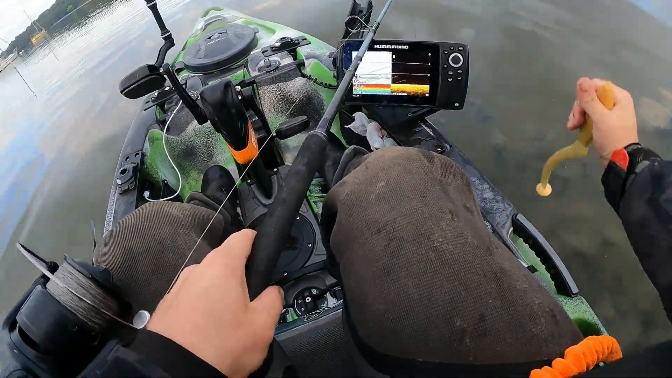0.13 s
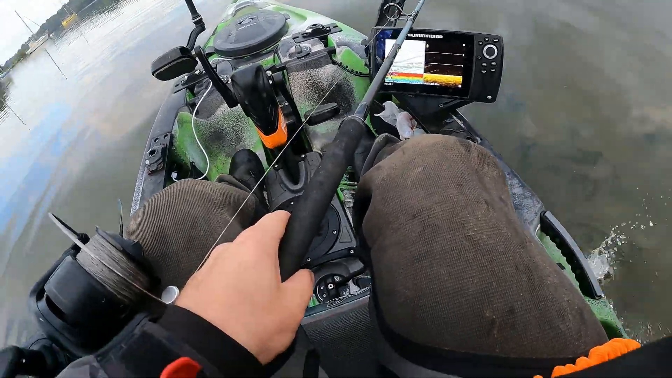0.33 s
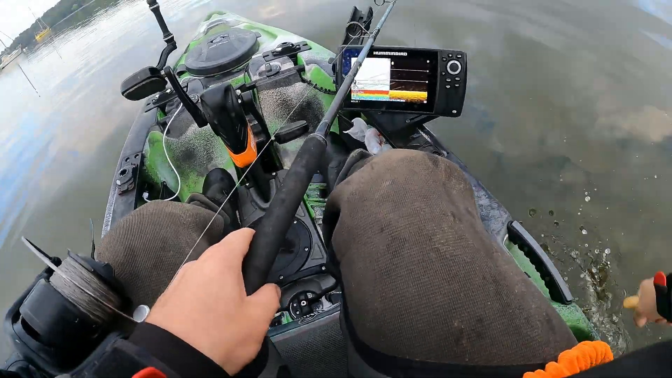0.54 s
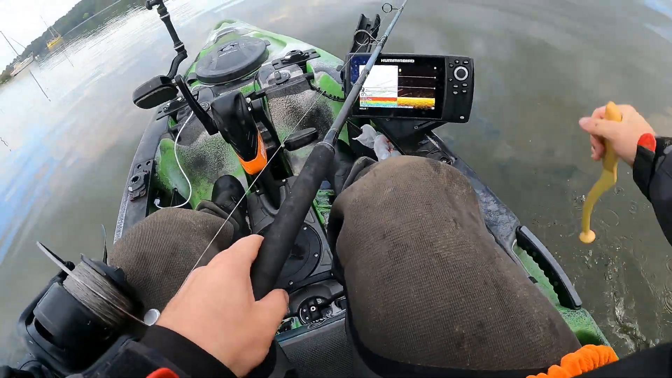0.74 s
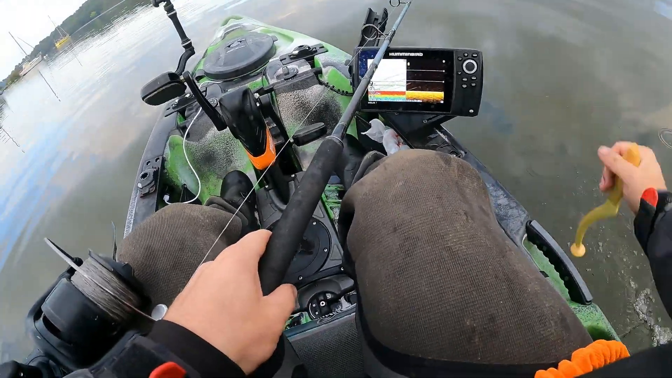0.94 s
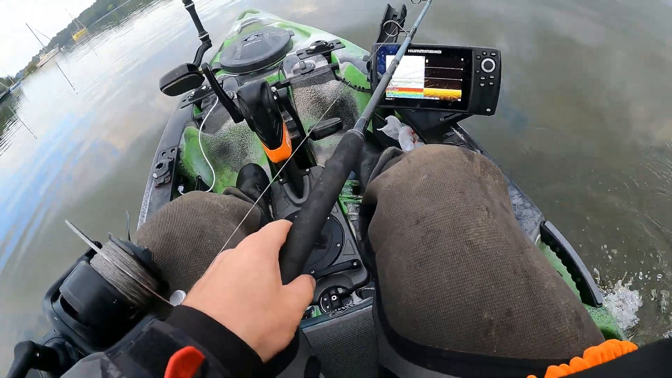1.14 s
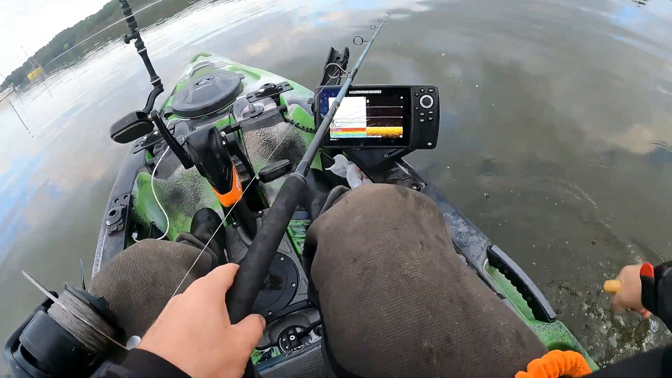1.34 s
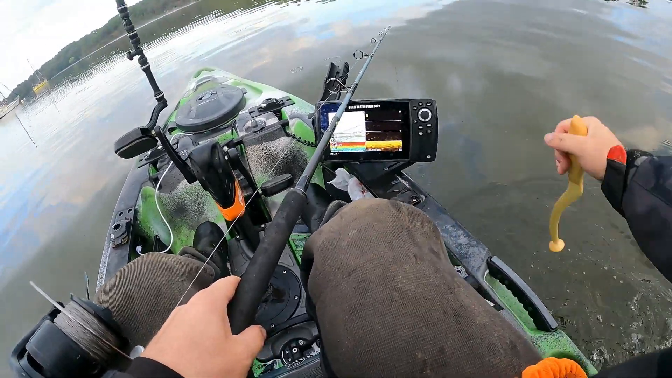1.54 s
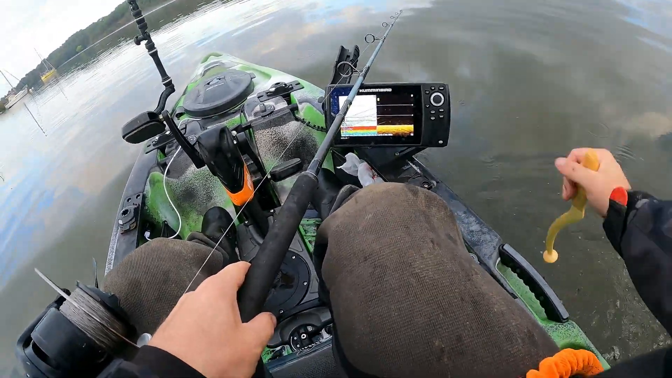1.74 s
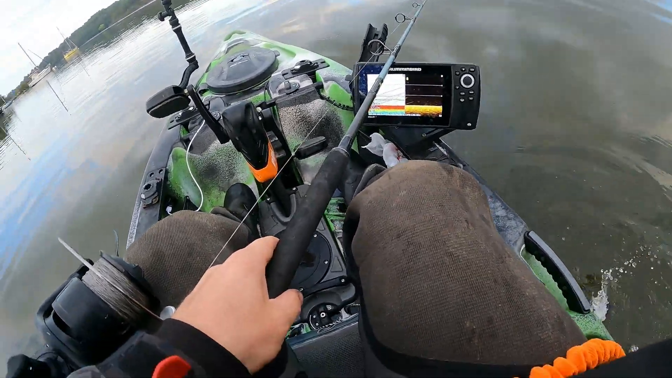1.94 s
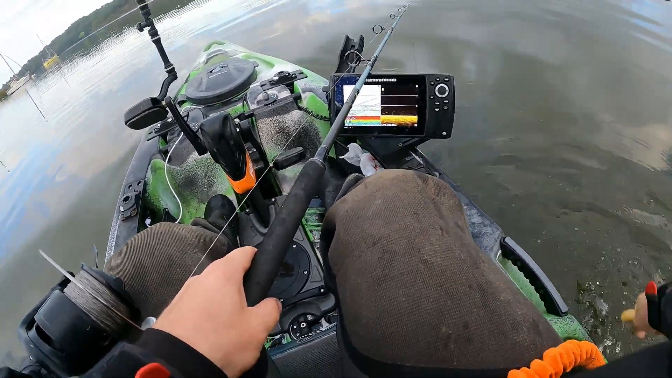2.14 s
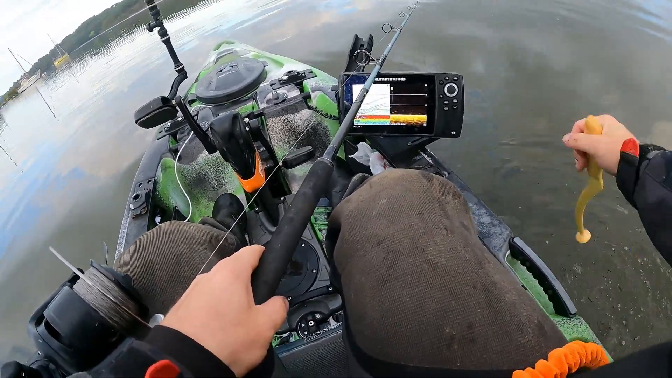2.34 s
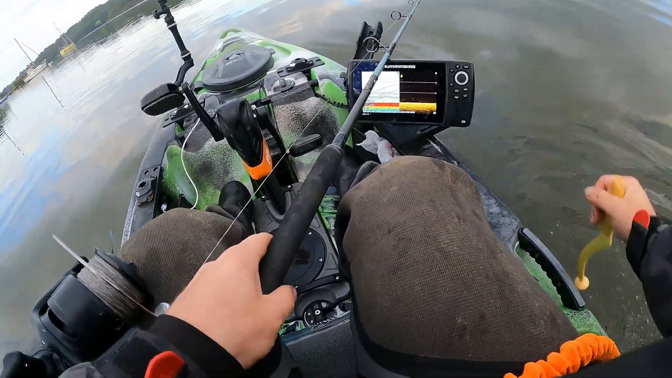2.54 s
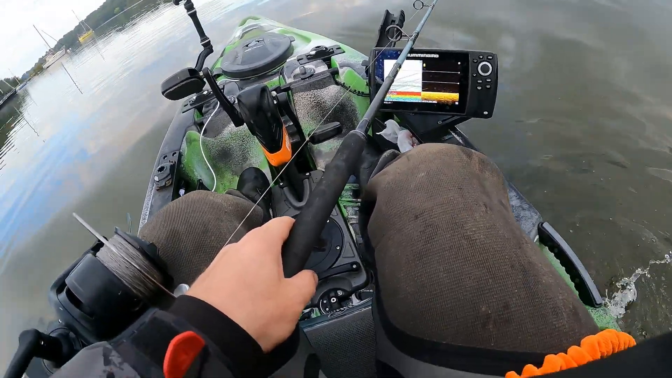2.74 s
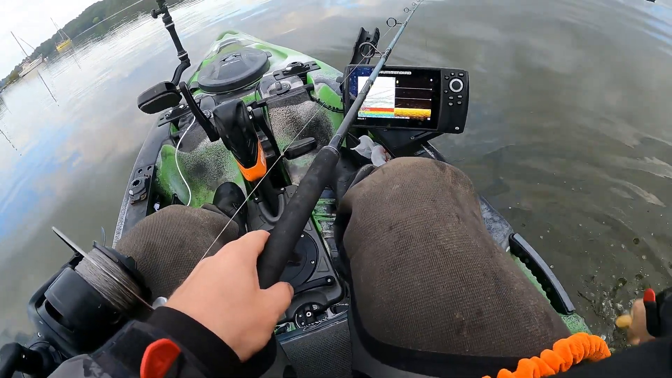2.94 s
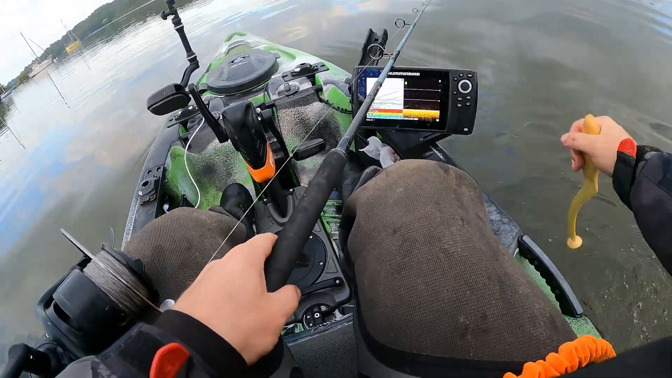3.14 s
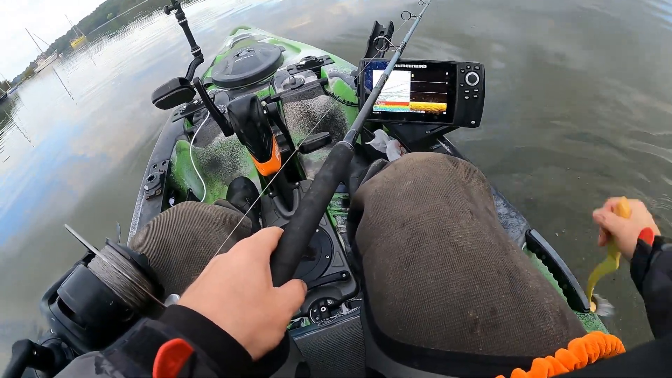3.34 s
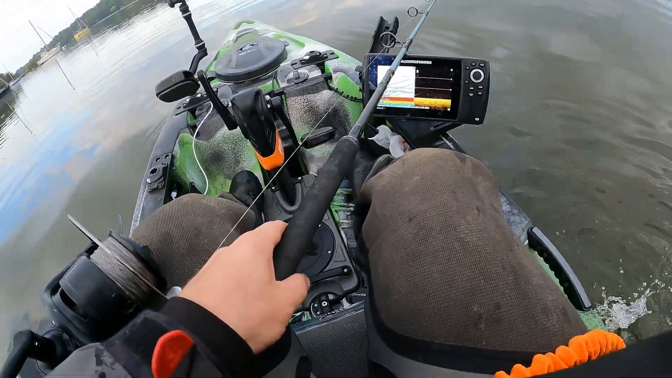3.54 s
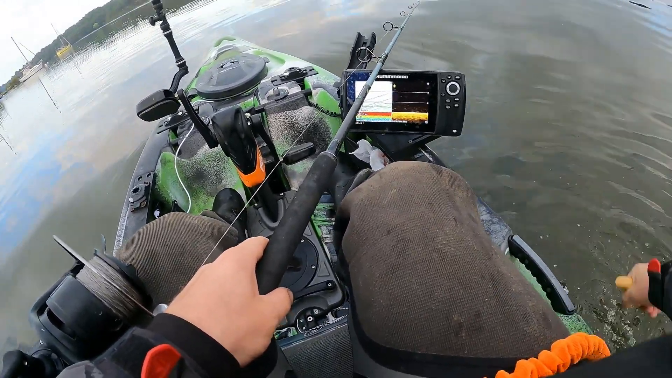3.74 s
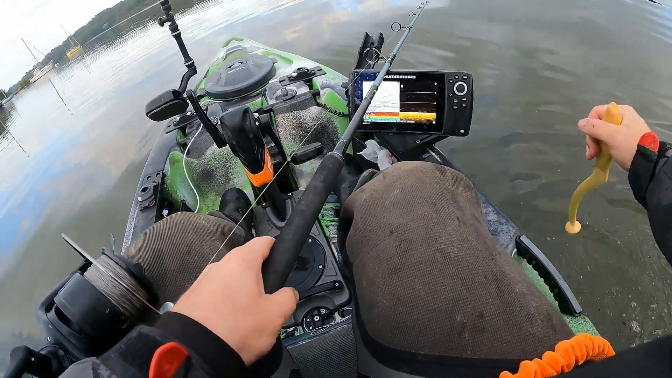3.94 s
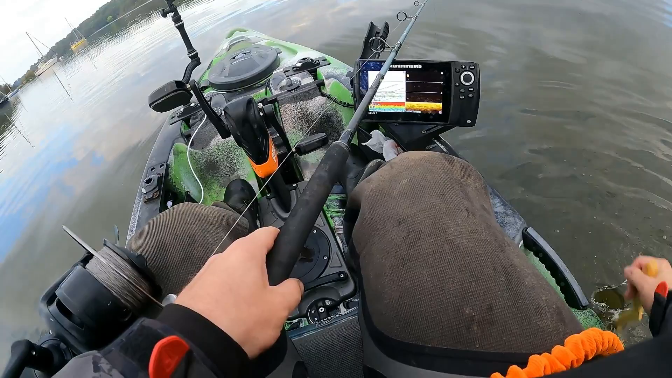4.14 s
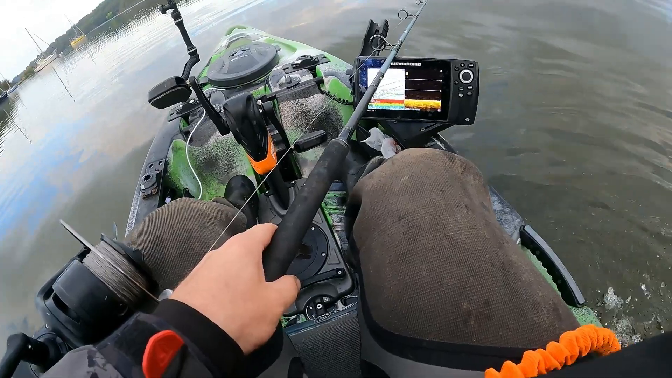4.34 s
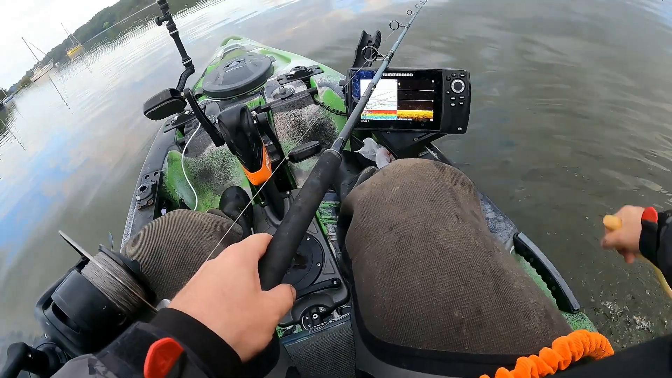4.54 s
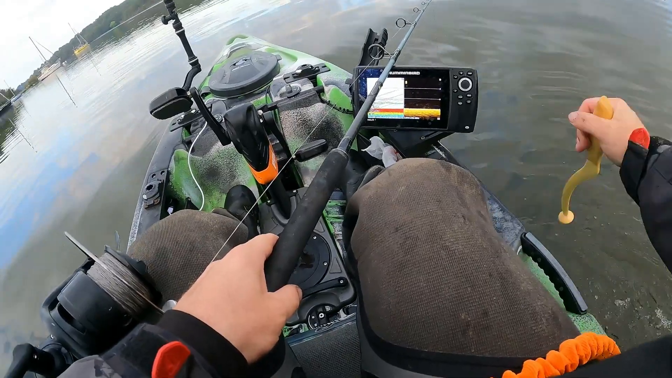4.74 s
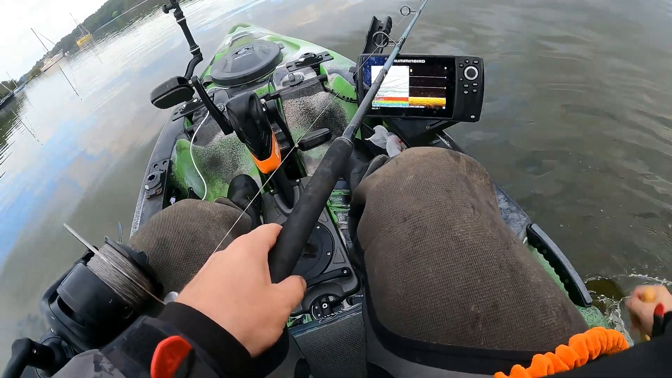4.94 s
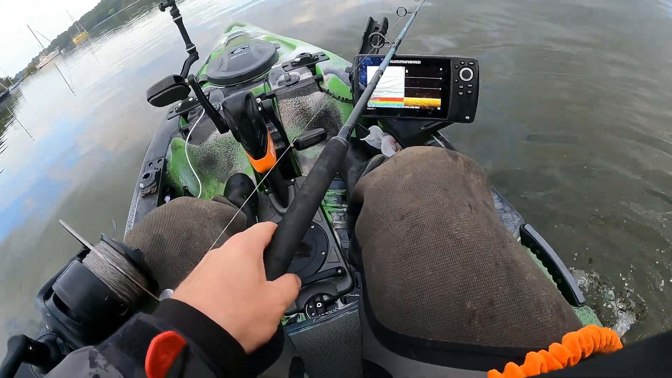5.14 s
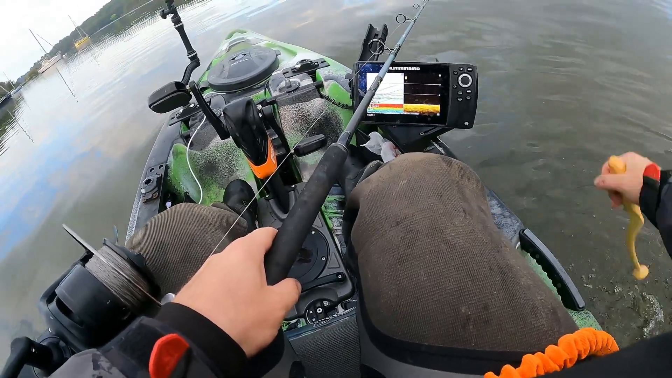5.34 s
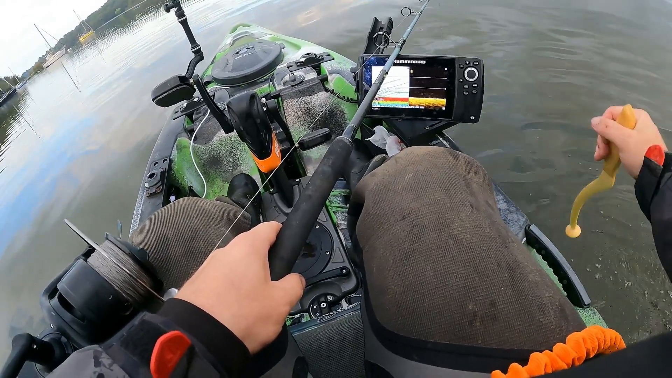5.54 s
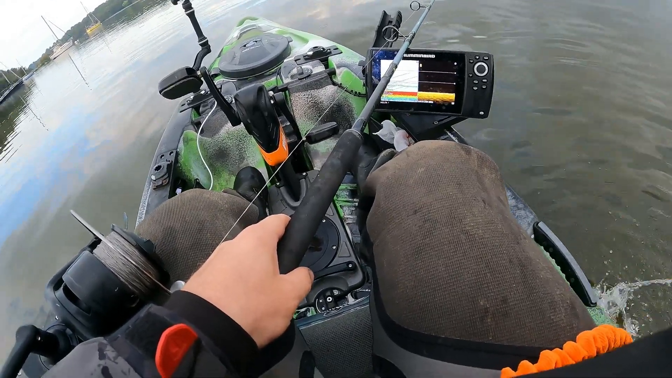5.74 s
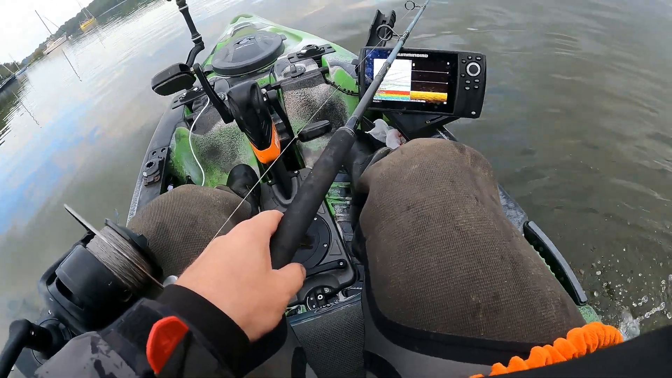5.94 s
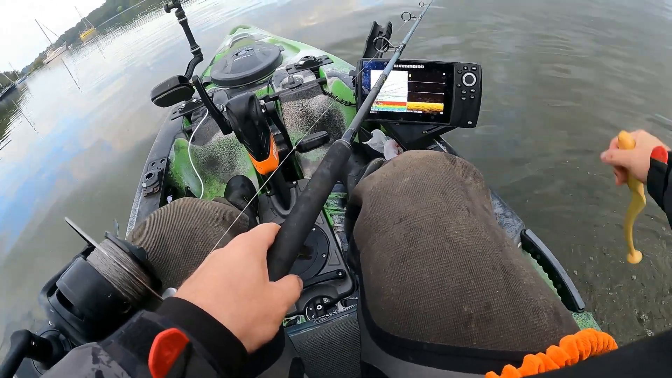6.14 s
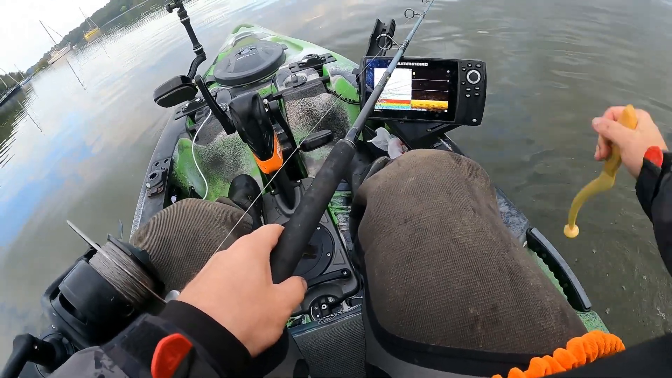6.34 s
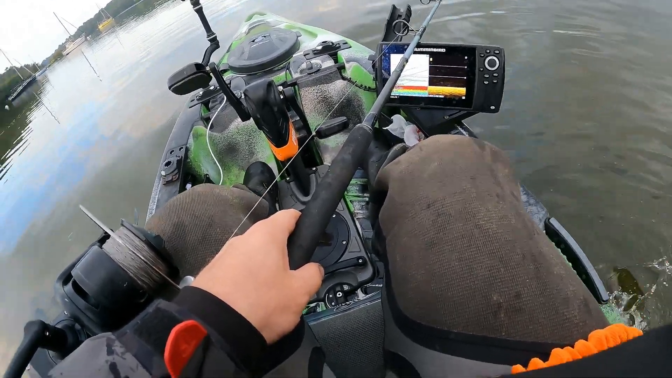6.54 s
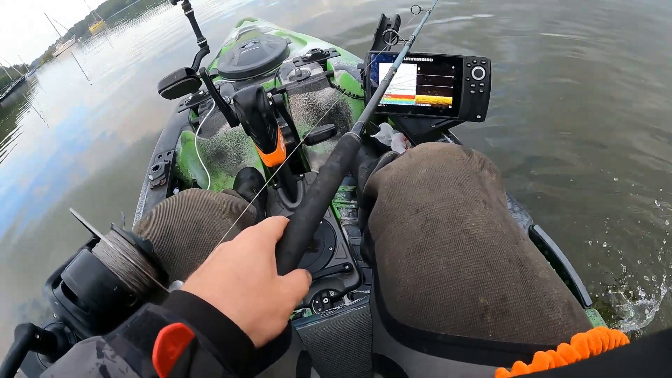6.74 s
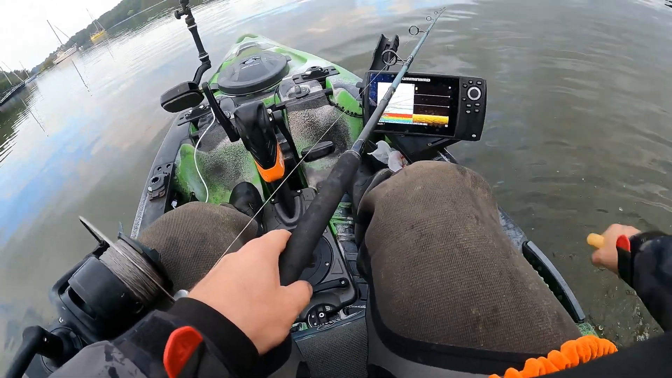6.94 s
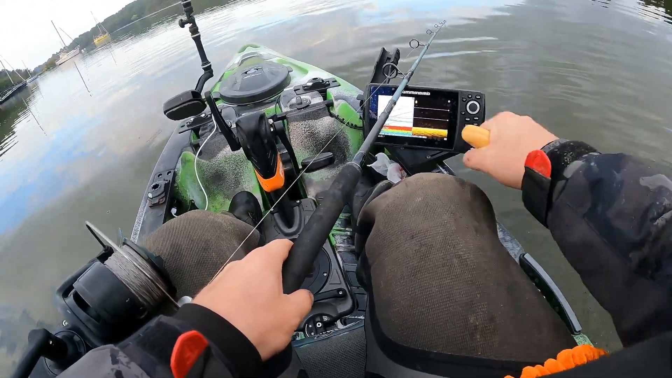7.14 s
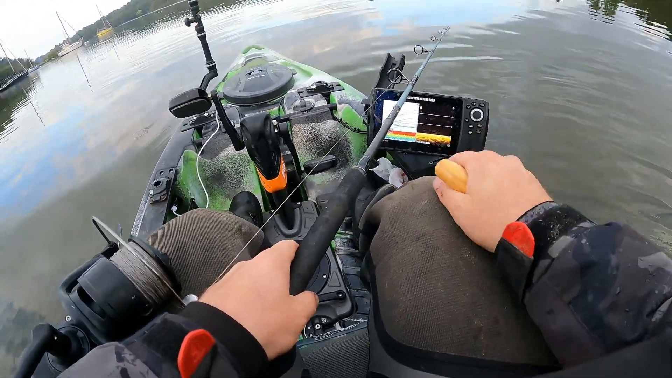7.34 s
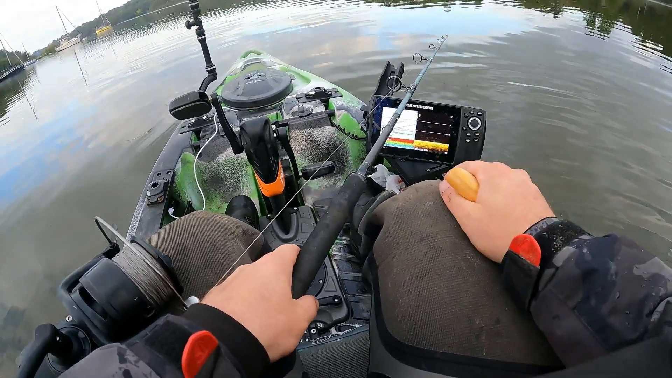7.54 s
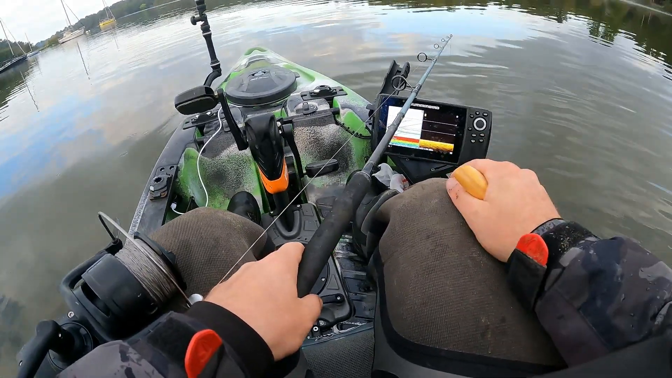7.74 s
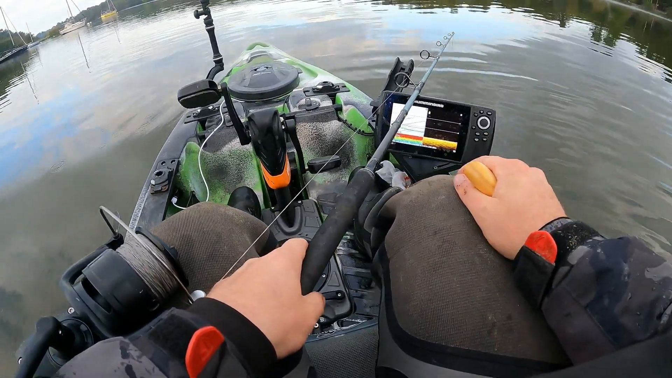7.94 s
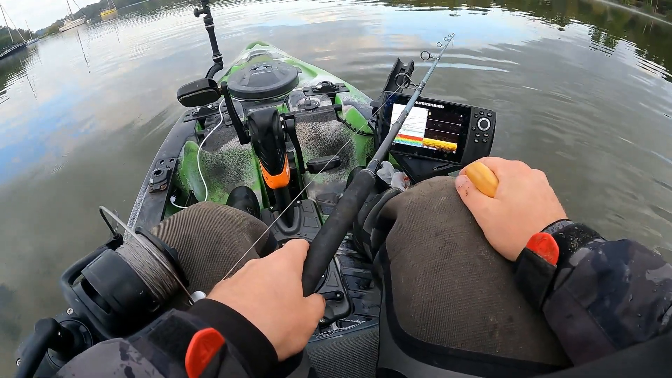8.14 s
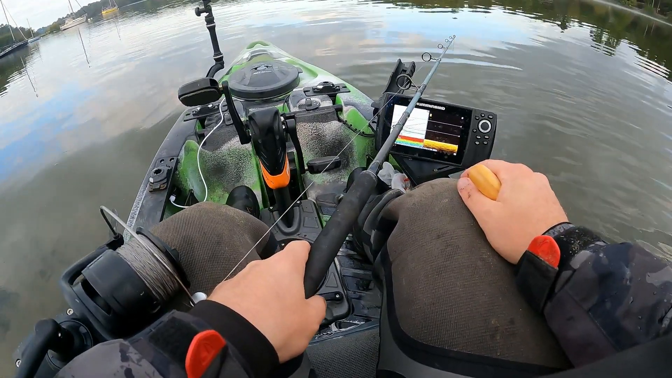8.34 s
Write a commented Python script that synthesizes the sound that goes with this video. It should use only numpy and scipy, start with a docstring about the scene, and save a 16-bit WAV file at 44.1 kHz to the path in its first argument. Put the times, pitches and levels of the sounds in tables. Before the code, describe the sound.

An even series of nine plunging strokes at arm's length on the right, heard from the angler's body on open water. Each starts with a short cloth swish, cracks into a wet slap with a heavy low thump, and ends in a hollow gulp rising in pitch. Bubbly splashes and run-off fall between, heavier at the beginning and near the eighth. After the last stroke come small knocks, a soft trouser rub and quiet rumbling air.

```python
"""In a kayak outdoors, an angler strikes a wooden clonk into the water nine times, an arm's length to the right.
Each stroke slaps the surface, drags a pocket of air down (its pitch falls) and lets it close with a rising gloop:
shaped noise for the torn water, gliding sines for the air. Spray lands as grit and ringing bubbles, filtered
noise shudders the hull, a jacket sleeve swishes with the arm, and drops tick, over a low rumble and faint hiss."""
import sys
import numpy as np
from scipy import signal
from scipy.fft import rfft, irfft, next_fast_len
from scipy.io import wavfile

SR = 44100
rng = np.random.default_rng(int(sys.argv[2]) if len(sys.argv) > 2 else 0)


def wrap_up_sound(samples):
    """Save the sound to the file named by the first command line argument, as 16-bit audio."""
    columns = np.atleast_2d(samples).T
    # keep every value between -1 and 1, then stretch to whole-number steps
    tamed = np.clip(columns, -1, 1)
    steps = np.round(tamed * 32767).astype(np.int16)
    wavfile.write(sys.argv[1], SR, steps)


N = 373968
TIME = np.arange(N) / SR


def undb(db):
    """Decibels to gain."""
    return 10 ** (np.asarray(db) / 20)


def unit(x):
    """Scale to rms 1."""
    return x / np.sqrt(np.mean(x ** 2))


def curve(rows):
    """Gain over time from (time_s, level_db) rows."""
    return undb(np.interp(TIME, *np.transpose(rows)))


def colour(x, points):
    """Minimum-phase filter through (frequency_hz, level_db) points, built from the cepstrum."""
    hz, db = np.transpose(points)
    size = next_fast_len(N + SR // 4, True) // 2 * 2
    bins_hz = np.arange(size // 2 + 1) * SR / size
    gain = undb(np.interp(np.log(bins_hz + 1), np.log(hz), db))
    cepstrum = irfft(np.log(gain))
    # folding the cepstrum forward makes the filter causal
    cepstrum[1:size // 2] *= 2
    cepstrum[size // 2 + 1:] = 0
    response = np.exp(rfft(cepstrum))
    return irfft(rfft(x, size) * response)[..., :N]


# difference between the two microphone ports: [frequency_hz, side_minus_mid_db]
PORT_WIDTH = [(25, -10), (70, -21), (250, -25), (600, -15), (1200, -13), (2200, -11), (5000, -10),
              (12000, -5)]


def noise(points, grain_db=0.):
    """Stereo noise of rms 1, gritty when grain_db is high; the ports differ most in the treble."""
    grains = np.repeat(rng.exponential(size=N // 32 + 1), 32)[:N]
    mid, side = rng.standard_normal((2, N)) * undb(grain_db * grains)
    side = colour(side, PORT_WIDTH)
    return unit(colour(np.array([mid + side, mid - side]), points))


def walk(rate):
    """Slow chance with a spread near 1, rate knots per second; it holds still after 2000 knots."""
    knots = rng.standard_normal(2000)
    return np.interp(TIME * rate, np.arange(len(knots)), knots)


def add(out, s, sound):
    """Mix a sound in at time s."""
    start = max(int(s * SR), 0)
    count = max(min(sound.shape[-1], N - start), 0)
    out[..., start:start + count] += sound[..., :count]


def sine(hz):
    """A sine that follows a pitch track."""
    return np.sin(2 * np.pi * np.cumsum(hz) / SR)


def swell(t, rise, fall):
    """Grows towards t = 0 and dies away after it."""
    return np.exp(-np.abs(t) / np.where(t < 0, rise, fall))


def hump(t, spread):
    """A smooth rise and fall around t = 0."""
    return np.exp(-.5 * (t / spread) ** 2)


def close(t, life):
    """Stays open, then shuts quickly."""
    return np.exp(-(t / life) ** 4)


def resonate(modes):
    """One noise source ringing in (pitch_hz, width_hz, level_db) modes, scaled to rms 1."""
    wash = rng.standard_normal(N)
    ring = 0
    for hz, width, db in modes:
        ring = ring + undb(db) * signal.lfilter(*signal.iirpeak(hz, hz / width, fs=SR), wash)
    return unit(ring)


def bubble(hz, t60, rise, pan=0.):
    """A bubble swells quickly and rings out; its pitch glides by the fraction rise each second."""
    t = TIME[:int(t60 * SR)]
    onset = 1 - np.exp(-14 * t / t60)
    ring = sine(hz * (1 + rise * t)) * undb(-60 * t / t60) * onset
    return ring * np.array([[1 + pan], [1 - pan]])


def swarm(centre_hz, octaves, turns, scatter_db, tilt_db, count):
    """Small bubbles at random moments, rms 1; the smaller ones are higher, shorter and mostly fainter."""
    out = np.zeros((2, N))
    moments = rng.uniform(0, TIME[-1], count)
    for s, (size, strength, glide, pan) in zip(moments, rng.standard_normal((count, 4))):
        hz = np.clip(centre_hz * 2 ** (octaves * size), 400, 9000)
        db = scatter_db * min(strength, 2) + tilt_db * max(size, -1)
        add(out, s, undb(db) * bubble(hz, turns / hz, 7 * (1 + glide), .15 * pan))
    return unit(out)


# relative level of the low rumble under open sky: [time_s, level_db]
RUMBLE_LEVEL = [(0, -41), (.5, -36), (1.0, -41), (1.9, -41.5), (2.5, -47), (3.4, -48), (4.6, -45),
                (6.3, -40.5), (7.05, -47), (7.6, -44), (8.48, -43)]
# spectrum of the rumble, with its hum: [frequency_hz, relative_db_per_hz]
RUMBLE_SPECTRUM = [(20, 2.5), (40, -4.5), (58, 5), (80, -1), (105, -1), (128, 9), (150, -2), (172, 3),
                   (200, -7), (245, -1.5), (320, -7), (370, -6.5), (450, -18), (900, -59.5)]
# spectrum of the open air: [frequency_hz, relative_db_per_hz]
AIR_SPECTRUM = [(290, -37), (500, -1.5), (699, -8.5), (1150, -51), (1250, -11), (1990, -37), (6880, -67),
                (7580, -33.5), (14000, -73)]


def outdoors(rumble_db=3, air_db=-62.5):
    """A low, humming, wavering rumble and a faint even hiss of open air, both coloured noise."""
    waver = undb(1.3 * walk(7))
    rumble = undb(rumble_db) * curve(RUMBLE_LEVEL) * waver * noise(RUMBLE_SPECTRUM)
    return rumble + undb(air_db) * noise(AIR_SPECTRUM)


# level of the water that trickles and laps between strokes: [time_s, level_db]
TRICKLE_LEVEL = [(0, -48), (.45, -44.5), (1.1, -67), (7.1, -55.5), (7.6, -64)]
# spray and run-off, one row a stroke: [spray_db, flight_s, spread_s, runoff_db, runoff_delay_s]
STROKE_SHOWERS = [(-41, 0.21, 0.16, -43, 0.3), (-44.5, 0.21, 0.17, -44.5, 0.55),
                  (-49.5, 0.22, 0.069, -49, .42), (-49, 0.2, 0.091, -53.5, 0.43),
                  (-50.5, 0.16, 0.16, -50, .4), (-43, 0.16, .08, -46.5, 0.34),
                  (-45.5, 0.12, 0.1, -42.5, 0.54), (-38, 0.19, 0.15, -39, .43),
                  (-48.5, 0.22, 0.095, -48.5, 0.38)]


def falling_water(delay_s=0.028, rise_s=0.018, fall_s=0.033, runoff_spread_s=0.072):
    """How much water is landing: each stroke's splash, its spray coming down, then the run-off from the clonk."""
    power = curve(TRICKLE_LEVEL) ** 2
    for (s, *_, splash_db), shower in zip(STROKES, STROKE_SHOWERS):
        spray_db, flight, spread, runoff_db, runoff_delay = shower
        t = TIME - s
        splash = undb(splash_db) * swell(t - delay_s, rise_s, fall_s)
        landing = undb(spray_db) * hump(t - flight, spread)
        runoff = undb(runoff_db) * hump(t - runoff_delay, runoff_spread_s)
        power = power + splash ** 2 + landing ** 2 + runoff ** 2
    return np.sqrt(power)


# spectrum of the landing wash: [frequency_hz, relative_db_per_hz]
SPRAY_SPECTRUM = [(200, -11), (500, 3), (1100, -8.5), (2000, 0), (3000, -17), (4300, -6), (7000, -25),
                  (12000, -38)]
# spectrum of tiny drops and ticks: [frequency_hz, relative_db_per_hz]
DROP_SPECTRUM = [(1500, 4), (3500, 0.5), (5800, 4), (8500, -2.5), (12000, -15), (15000, -11)]


def spray(wash_db=-9, gurgle_db=-3.0, drip_db=-7, spatter_db=-10.0, crackle_db=-15, clump_db=3):
    """Landing water: gritty noise for wash and crackle, swarms of bubbles for gurgle, longer drips and spatter."""
    gurgle = swarm(1350, .7, turns=19, scatter_db=4.0, tilt_db=-2.5, count=2400)
    drips = swarm(1000, .6, turns=34, scatter_db=3, tilt_db=-2, count=220)
    spatter = swarm(3400, .55, turns=24, scatter_db=4.3, tilt_db=-2, count=3200)
    crackle = noise(DROP_SPECTRUM, grain_db=3.4)
    wash = noise(SPRAY_SPECTRUM, grain_db=2.5)
    clumps = undb(clump_db * walk(55))
    bubbles = undb(gurgle_db) * np.sqrt(clumps) * gurgle + undb(drip_db) * drips
    fine = undb(spatter_db) * spatter + undb(crackle_db) * crackle + undb(wash_db) * wash
    return falling_water() * (bubbles + clumps * fine)


# relative level of the jacket's light rustle between swings: [time_s, level_db]
RUSTLE_LEVEL = [(0, -55), (1.9, -60.5), (2.45, -73), (4.2, -69), (5.6, -70), (6.2, -82), (6.9, -67.5),
                (8.48, -74)]
# sleeve with the arm, one row a stroke: [downswing_db, lift_db], relative
ARM_SWINGS = [(-42.5, -68), (-47, -59), (-45, -60.5), (-50.5, -69), (-56.5, -81), (-57, -56), (-47, -59.5),
              (-52, -49.5), (-47.5, -59)]
# a hand slides onto the trouser knee: [time_s, level_db]
RUB_LEVEL = [(7.36, -63), (7.45, -50), (7.53, -44.5), (7.6, -47.5), (7.66, -57)]
# spectrum of the sleeve: [frequency_hz, relative_db_per_hz]
SLEEVE_SPECTRUM = [(290, -10.5), (500, 3), (835, -8.5), (935, -3), (1060, -6), (1450, -4.5), (1700, -10.5),
                   (2050, -9), (2530, -13), (6670, -17), (8490, -26), (12100, -29.5), (14000, -26),
                   (15000, -57)]
# spectrum of the hand on the knee: [frequency_hz, relative_db_per_hz]
RUB_SPECTRUM = [(240, -52), (400, -2.5), (502, -0.5), (556, -5), (1490, -11.5), (3070, -21.5),
                (6000, -24.5), (7800, -54), (13200, -120)]


def clothes(sleeve_db=4, rustle_db=6, weave_db=-13):
    """Gritty noise of a sleeve swishing down into each stroke and up again; at the end a hand rests on the knee."""
    down_lead_s, down_rise_s, down_fall_s = 0.016, .13, 0.049
    lift_delay_s, lift_spread_s = 0.33, 0.21
    power = (undb(rustle_db) * curve(RUSTLE_LEVEL)) ** 2
    for (s, *_), (down_db, lift_db) in zip(STROKES, ARM_SWINGS):
        t = TIME - s
        down = undb(down_db) * swell(t + down_lead_s, down_rise_s, down_fall_s)
        lift = undb(lift_db) * hump(t - lift_delay_s, lift_spread_s)
        power = power + down ** 2 + lift ** 2
    folds = undb(1.6 * walk(45))
    sleeve = undb(sleeve_db) * folds * np.sqrt(power) * noise(SLEEVE_SPECTRUM, grain_db=2.0)
    weave = undb(weave_db) * noise(SWISH_SPECTRUM, grain_db=2.5)
    return sleeve + curve(RUB_LEVEL) * (noise(RUB_SPECTRUM) + weave)


# the clearest drops on jacket and deck: [start_s, level_db], relative
DROP_TICKS = [(0.3534, -32), (0.7754, -23.5), (1.6107, -29.5), (1.66, -31.5), (2.0046, -29),
              (2.7526, -32.5), (2.799, -30.5), (3.2905, -36), (3.3203, -39), (4.335, -35), (5.8624, -26.5),
              (7.201, -39), (7.3522, -40), (7.8361, -42)]
# light knocks of gear on the boat: [start_s, level_db, pitch_hz], level relative
GEAR_KNOCKS = [(2.253, -38, 442), (7.129, -28.5, 934), (7.287, -34.5, 610), (7.321, -35.5, 533)]


def ticks(tick_db=-4, tick_s=0.0014, stray_db=-41, knock_db=-1, knock_t60=0.022, count=26):
    """Drops tick on cloth and plastic as tiny noise bursts, faint strays among them; gear knocks as damped sines."""
    strikes, knocks, t = np.zeros(N), np.zeros(N), TIME[:SR // 15]
    strays = [(when * TIME[-1], stray_db + 8 * (size - .5)) for when, size in rng.random((count, 2))]
    for s, db in list(DROP_TICKS) + strays:
        add(strikes, s, undb(db + tick_db) * np.exp(-t / tick_s))
    knock_modes = [(.7, -1.5), (1, -1.5), (1.45, -9.5), (2.1, -11)]  # pitch ratio, dB
    for s, db, hz in GEAR_KNOCKS:
        ring = sum(undb(mode_db) * np.sin(2 * np.pi * hz * ratio * t) for ratio, mode_db in knock_modes)
        add(knocks, s, undb(db + knock_db - 60 * t / knock_t60) * ring)
    return strikes * noise(DROP_SPECTRUM) + knocks


# the largest bubbles, from falling spray or left below by a stroke:
# [start_s, level_db, pitch_hz, t60_s, relative_pitch_rise_per_s]
LARGE_BUBBLES = [(0.442, -15, 293, 0.05, -4), (0.545, -14, 1230, 0.015, 19), (0.546, -16.5, 740, 0.039, 18),
                 (0.595, -18, 616, 0.061, -3.5), (0.673, -20.5, 400, .053, 4), (0.704, -18, 524, 0.025, -4),
                 (0.75, -18.5, 520, 0.025, 0), (0.753, -20.5, 2170, .023, -5),
                 (0.846, -23.5, 1240, .02, 17), (1.412, -26, 1100, 0.05, 22),
                 (1.511, -24.5, 532, .068, 20.5), (2.143, -13, 76, 0.23, 1), (2.254, -19.5, 460, 0.017, 5),
                 (2.475, -30.5, 1050, .028, -1), (3.004, -26.5, 1040, 0.04, 18),
                 (4.018, -31.5, 1000, 0.08, -3), (4.467, -18, 940, 0.021, 12),
                 (5.186, -24.5, 1780, 0.04, 6), (5.26, -24, 925, .035, -3), (5.385, -26, 1160, 0.026, 14),
                 (5.948, -16, 1130, .035, -3), (5.958, -15, 710, .017, -8), (6.054, -16.5, 620, 0.035, 2),
                 (6.078, -9.5, 382, 0.042, 15), (6.127, -19, 1530, 0.018, 32), (6.166, -26, 680, .025, -5),
                 (6.296, -18.5, 1140, 0.033, 32), (6.297, -22.5, 1640, 0.018, 17),
                 (6.388, -24, 507, 0.19, 3), (6.401, -22, 1460, 0.024, 12), (6.671, -15.5, 5100, 0.0039, 4),
                 (6.901, -19.5, 1285, .039, -4), (7.038, -30, 2600, .022, 15)]


def plops():
    """The larger bubbles that stand out of the spray, each a ringing, gliding sine."""
    out = np.zeros((2, N))
    pans = rng.standard_normal(len(LARGE_BUBBLES))
    for (s, db, hz, t60, rise), pan in zip(LARGE_BUBBLES, pans):
        add(out, s, undb(db) * bubble(hz, t60, rise, 0.13 * pan))
    return out


# spectrum of the bright swish: [frequency_hz, relative_db_per_hz]
SWISH_SPECTRUM = [(1500, -9), (4500, 4), (8000, -2), (12000, -9), (15000, -9)]


def swish(db=-49, lead_s=.016, spread_s=0.025, ragged_db=3.):
    """A bright, ragged noise hiss as the stroke reaches full speed, just before the cup goes in."""
    speed = sum(hump(TIME - s + lead_s, spread_s) for s, *_ in STROKES)
    return undb(db + ragged_db * walk(130)) * speed * noise(SWISH_SPECTRUM, grain_db=2.5)


# the cup meets the water, one row a stroke (treble_db is relative to level_db):
# [start_s, level_db, treble_db, opening_pocket_db, rise_s, fall_s, wood_ring_db, hull_shudder_db, splash_db]
STROKES = [(0.511, -14, 0, -21, 0.0023, 0.0072, -40, -38, -30.5),
           (1.2548, -19.5, 1, -29, 0.0048, 0.0072, -30.5, -29.5, -33),
           (2.061, -14, -2, -15.5, 0.0027, 0.0049, -27.5, -29, -37),
           (2.8533, -14.5, -10, -16, 0.0066, 0.012, -44, -29.5, -54),
           (3.6250, -18, -13, -21, 0.0064, 0.013, -59, -31, -38),
           (4.38, -17, -5.5, -24, 0.0089, 0.02, -37, -29.5, -35),
           (5.152, -12.5, -4, -11.5, 0.005, 0.0046, -55, -29.5, -46),
           (5.9110, -23, 0.5, -14.5, 0.0054, 0.0031, -41, -30.5, -28),
           (6.7118, -18.5, -3, -20, 0.0091, 0.0099, -24, -34, -59)]
# spectrum of the torn water: [frequency_hz, relative_db_per_hz]
SLAP_SPECTRUM = [(150, 7.5), (400, 8), (700, -4.5), (1000, 1), (1400, -1.5), (2000, -11), (2900, -14.5),
                 (4200, -13), (6000, -18), (8500, -27.5), (12000, -34.5), (15000, -33)]
# modes of the wooden handle: [pitch_hz, width_hz, relative_db]
HANDLE_MODES = [(1436, 36, 2), (2063, 91, 8), (4060, 100, 2)]


def slaps(herald_db=-19, lead_s=0.015, trail_s=0.062, split_hz=2600, ring_s=0.012):
    """A noise burst of torn water as the cup enters, heralded by the swish of the stroke; the wood rings briefly."""
    body, treble, ring = np.zeros((3, N))
    for s, db, treble_db, _, rise, fall, ring_db, *_ in STROKES:
        near = np.abs(TIME - s) < .3
        t = TIME[near] - s
        burst = swell(t, rise, fall) + undb(herald_db) * swell(t, lead_s, trail_s)
        body[near] += undb(db) * burst
        treble[near] += undb(db + treble_db) * burst
        ring[near] += undb(ring_db) * swell(t, rise, ring_s)
    water = noise(SLAP_SPECTRUM, grain_db=2.5) * undb(2.8 * walk(300))
    low = signal.sosfilt(signal.butter(1, split_hz, fs=SR, output="sos"), water)
    return low * body + (water - low) * treble + ring * resonate(HANDLE_MODES)


# the cup shoves the water aside in one deep swing: [start_s, level_db, pitch_hz]
WATER_SHOVES = [(0.5014, -9.5, 168), (1.2534, -10.5, 137), (2.0607, -9, 80), (2.8528, -9, 96),
                (3.6215, -13, 108), (4.3817, -12.5, 119), (5.15, -4.5, 141), (5.9119, -11, 169),
                (6.7073, -11, 64)]


def plunges(shallow_hz=1450, deep_hz=380, cycles=1.31):
    """The pocket deepens, so its note dives; then the shoved water gives one heavy swing."""
    out = np.zeros(N)
    depth = np.linspace(0, 1, int(.009 * SR))
    dive = sine(shallow_hz + (deep_hz - shallow_hz) * depth) * np.sin(np.pi * depth ** 2)
    for s, _, _, db, *_ in STROKES:
        add(out, s - .007, undb(db) * dive)
    t = TIME[:SR // 10]
    for s, db, hz in WATER_SHOVES:
        add(out, s, -undb(db) * np.sin(2 * np.pi * hz * t) * close(t, cycles / hz))
    return out


# the air pocket closes:
# [start_s, level_db, start_hz, final_hz, glide_s, t60_s, lifetime_s, first_overtone_hz, overtone_db]
POCKET_GLOOPS = [(0.5093, -10.5, 189, 246, 0.099, 0.52, 0.054, 518, -24),
                 (1.2531, -10, 104, 371, 0.12, 0.32, 0.1, 505, -23),
                 (2.0785, -3.5, 67, 256, 0.0077, 1, 0.04, 583, -26.5),
                 (2.8628, -3.5, 150, 423, 0.046, 0.96, 0.043, 571, -25.5),
                 (3.625, -9, 113.5, 327, 0.043, 0.73, 0.063, 592, -26.5),
                 (4.3913, -11, 141, 427, 0.12, 0.45, 0.079, 581, -27.5),
                 (5.1582, -14.5, 142.4, 410, 0.117, 0.72, 0.081, 552, -28),
                 (5.915, -10.5, 140.5, 404, 0.12, 0.21, 0.41, 485, -25),
                 (6.7241, -1, 144, 427, 0.026, 0.42, 0.032, 547, -26.5)]
# higher modes of the tube of air: [ratio_to_first_overtone, relative_db, t60_s]
TUBE_MODES = [(1.001, 5.5, 0.13), (1.68, -7.5, 0.49), (2.25, -12, 0.35), (3.3, -15, 0.2)]


def gloops(overtone_rise=7.5, overtone_life=0.66, shut=0.8, remnant=0.24, linger_s=0.014):
    """The pocket snaps open to the air and rings; it shortens as water returns, so its modes rise until it shuts."""
    out, t = np.zeros(N), TIME[:SR // 5]
    for s, db, start_hz, final_hz, glide, t60, life, over_hz, over_db in POCKET_GLOOPS:
        hz = final_hz - (final_hz - start_hz) * np.exp(-t / glide)
        # once the mouth has shut, the trapped air rings on more weakly
        mouth = (1 - remnant) * close(t, shut * life) + remnant * close(t, life + linger_s)
        add(out, s, -sine(hz) * undb(db - 60 * t / t60) * mouth)
        for ratio, mode_db, mode_t60 in TUBE_MODES:
            # the rippling walls make the higher modes waver
            ripple = walk(160)[:len(t)]
            hz = over_hz * ratio * (1 + 0.057 * ripple) * (1 + overtone_rise * t)
            gain = undb(over_db + mode_db + 2 * ripple - 60 * t / mode_t60)
            add(out, s, sine(hz) * gain * close(t, overtone_life * life))
    return out


# modes of the hollow hull: [pitch_hz, width_hz, relative_db]
HULL_MODES = [(63.2, 5.1, 12), (89.8, 2.8, 7.5), (118.9, 6.2, 11), (162, 8.3, -26), (264, 9.1, -43)]


def hull(delay_s=0.092, rise_s=0.075, fall_s=0.1, side_db=-12):
    """The collapsing water reaches the hollow hull and makes it shudder, its two walls a little differently."""
    push = sum(undb(db) * swell(TIME - s - delay_s, rise_s, fall_s) for s, *_, db, _ in STROKES)
    both_walls = resonate(HULL_MODES)
    difference = undb(side_db) * resonate(HULL_MODES) * np.array([[1], [-1]])
    return push * (both_walls + difference)


# level between the microphone ports: [frequency_hz, left_minus_right_db]
PORT_BALANCE = [(250, 0), (500, -2.8), (1000, -1.5), (2000, -1.5), (4000, -.6), (8000, 1.6), (12000, 2.6)]
# phase between the ports, negative where the right leads: [frequency_hz, left_lead_rad]
PORT_LEAD = [(250, 0), (500, -.7), (780, -.8), (1120, -.3), (1500, -.6), (2800, -1.1), (4000, -.45),
             (6000, -.3), (8000, 0)]


def from_right(x):
    """Sound from the right reaches the two ports with different phase and level."""
    hz = np.fft.rfftfreq(N, 1 / SR)
    balance = undb(np.interp(hz, *np.transpose(PORT_BALANCE)))
    lead = np.interp(hz, *np.transpose(PORT_LEAD))
    # each port takes half of the difference
    half = np.sqrt(balance) * np.exp(.5j * lead)
    return irfft(rfft(x) * np.array([half, 1 / half]), N)


def scene():
    """Water and arm on the right, the boat below, open air all round."""
    water = slaps() + plunges() + gloops() + spray() + plops()
    return from_right(water + clothes() + swish()) + hull() + ticks() + outdoors()


# the microphone's top end: [frequency_hz, gain_db]
MICROPHONE_TOP = [(12400, 0), (13300, -11), (15000, -20)]


def record(dry, ceiling=.82, top_hz=15000):
    """The microphone chain rounds the highest peaks and loses the top of the treble."""
    held = dry / (1 + np.abs(dry / ceiling) ** 6) ** (1 / 6)
    low_pass = signal.ellip(8, .2, 70, top_hz, fs=SR, output="sos")
    return signal.sosfilt(low_pass, colour(held, MICROPHONE_TOP))


dry = scene()
out = record(dry)
wrap_up_sound(out)
```